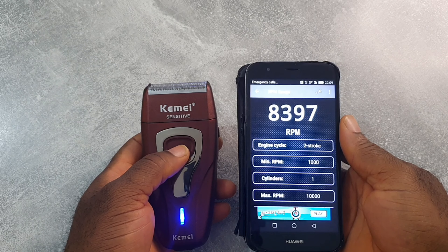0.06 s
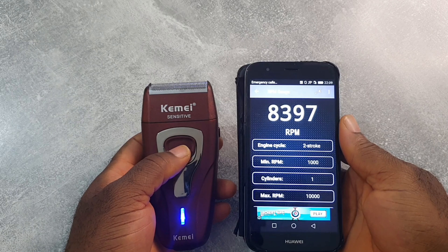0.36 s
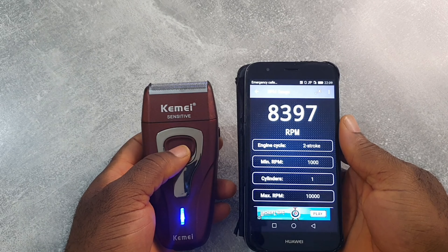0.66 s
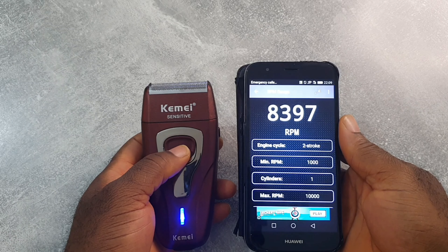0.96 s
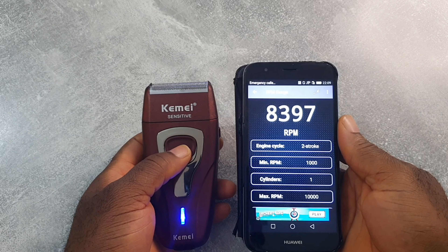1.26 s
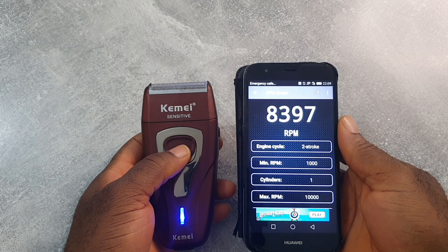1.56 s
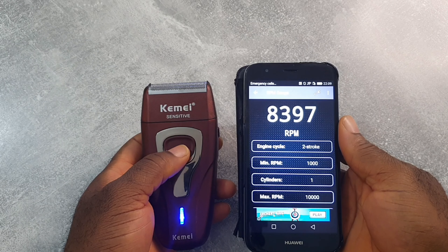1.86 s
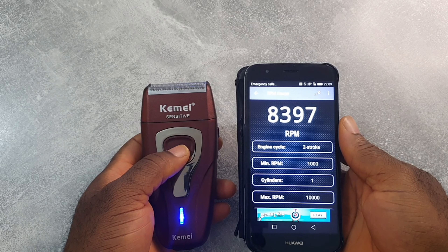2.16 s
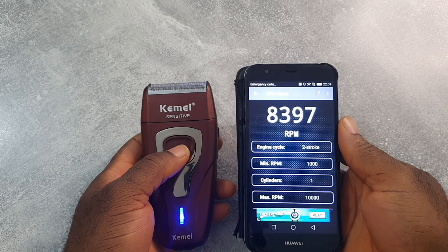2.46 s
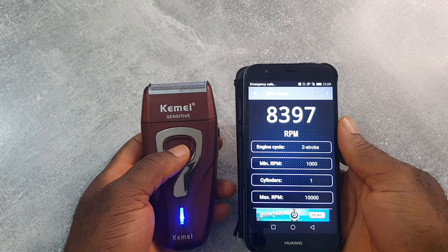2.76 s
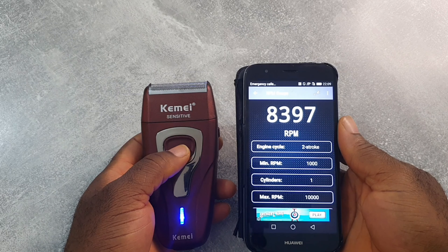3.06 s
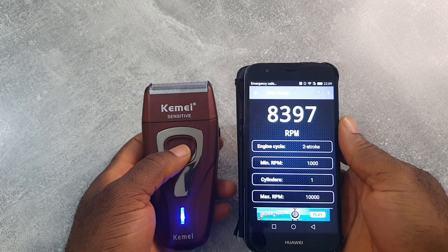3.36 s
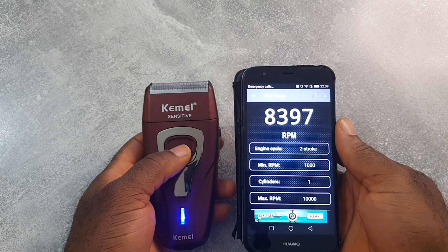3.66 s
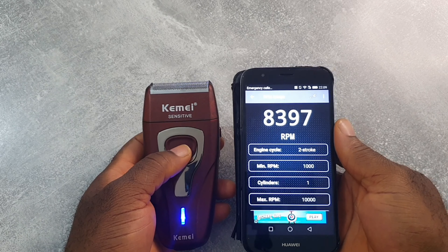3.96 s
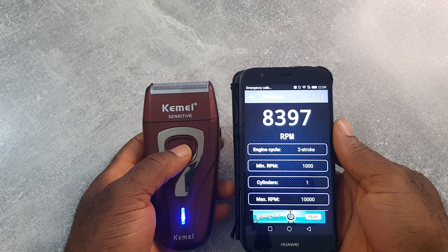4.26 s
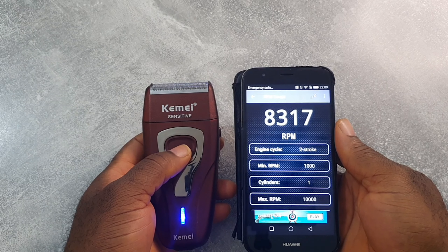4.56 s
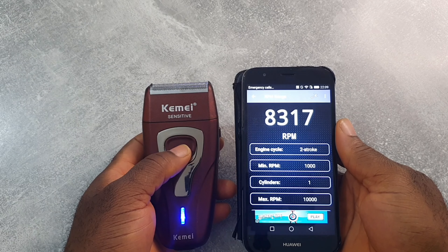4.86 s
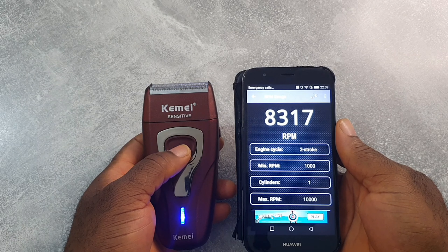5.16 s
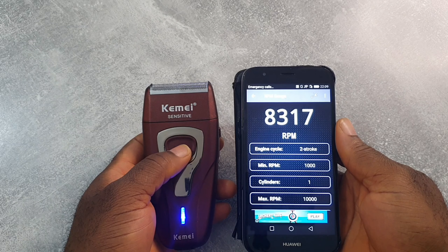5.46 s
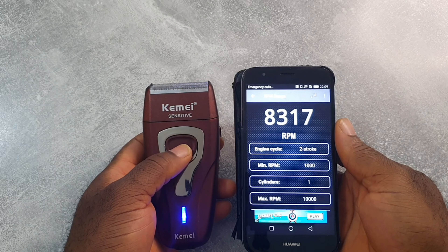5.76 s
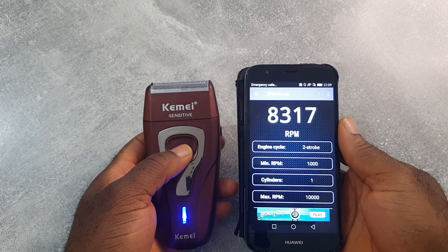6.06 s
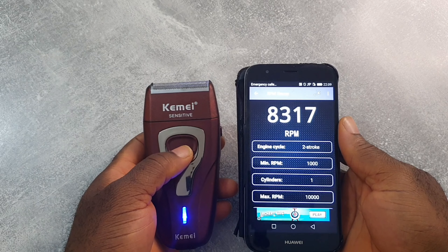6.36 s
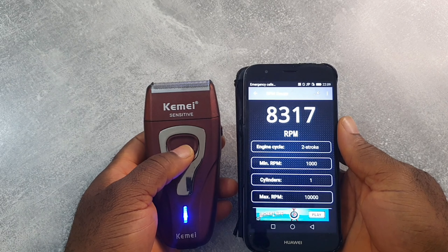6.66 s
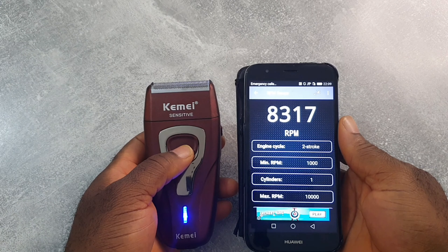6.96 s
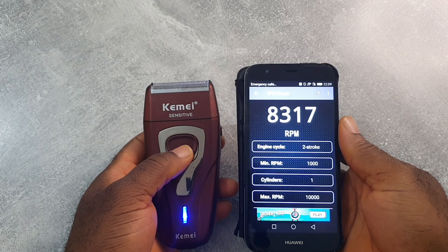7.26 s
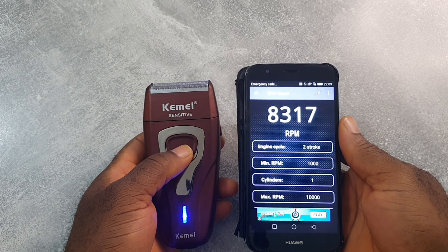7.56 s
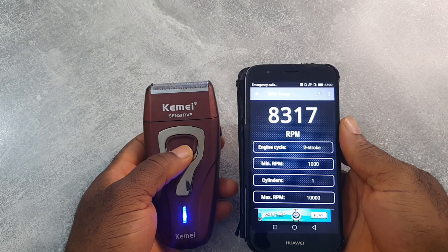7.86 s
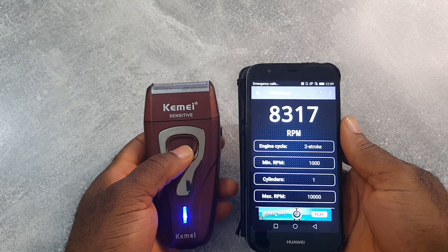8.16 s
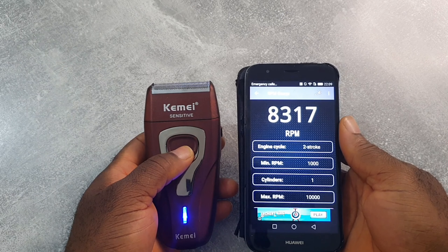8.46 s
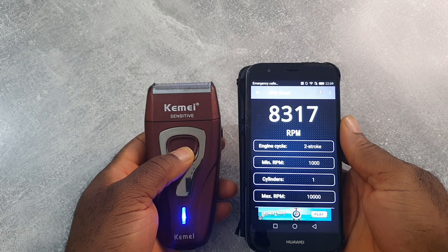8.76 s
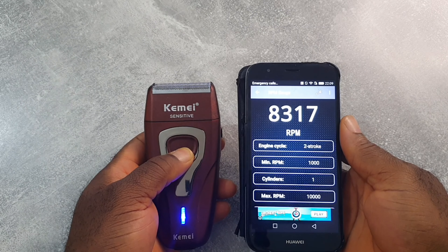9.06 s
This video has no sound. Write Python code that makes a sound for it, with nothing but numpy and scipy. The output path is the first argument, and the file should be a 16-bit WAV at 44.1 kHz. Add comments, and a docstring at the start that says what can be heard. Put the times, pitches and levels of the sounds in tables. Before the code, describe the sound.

A small electric foil shaver runs close to the microphone in a quiet room. Its steady buzz mixes a plastic drone with a bright metallic rattle and a fine hiss, and now and then the blades rasp briefly. About midway the pitch sags very slightly and the tone changes colour, then the buzz carries on. A ceiling fan hums faintly underneath throughout.

```python
"""In a quiet room, a small foil shaver runs in someone's hand, close to a phone.
Each motor turn throws the blades to and fro: a few knocks ring the plastic case and metal head,
and the blades hiss under the foil. Now and then the blades slip, speed up and rasp.
Midway a firmer grip slows the motor a little and changes the colour of the buzz.
A ceiling fan hums and throbs far below it in pitch."""
import sys
import numpy as np
from scipy import signal
from scipy.fft import rfft, irfft
from scipy.io import wavfile
from scipy.ndimage import uniform_filter1d, map_coordinates

SR = 44100
rng = np.random.default_rng(int(sys.argv[2]) if len(sys.argv) > 2 else 0)


def generate_wav(signal):
    """Clip the signal to [-1, 1] and save it as 16-bit WAV at the path in sys.argv[1]."""
    frames = np.transpose(np.atleast_2d(signal))
    scaled = np.clip(frames, -1, 1) * 32767
    pcm = np.round(scaled).astype(np.int16)
    wavfile.write(sys.argv[1], SR, pcm)


N = 401751
TIME = np.arange(N) / SR


def undb(db):
    """Turn decibels into a gain to multiply by."""
    return 10 ** (np.asarray(db) / 20)


def read(table, at):
    """Look up `at` in the first column; give the other columns, joining rows by straight lines."""
    x, *columns = np.transpose(table)
    return [np.interp(at, x, c) for c in columns]


def noise(spectrum, likeness):
    """Stereo noise of spread 1, shaped by (pitch_hz, level_db) rows; likeness 1 makes both ears alike."""
    hz, db = np.transpose(spectrum)
    bin_hz = np.arange(N // 2 + 1) * SR / N
    gain = undb(np.interp(np.log(bin_hz + 1), np.log(hz), db))
    white = rng.standard_normal((3, N))
    stereo = np.sqrt(likeness) * white[2] + np.sqrt(1 - likeness) * white[:2]
    x = irfft(rfft(stereo) * gain, N)
    return x / x.std()


def wander(shape, size):
    """A random drift of spread 1, smoothed over `size` rows: bigger is slower."""
    x = rng.standard_normal(shape)
    for _ in range(2):
        x = uniform_filter1d(x, size, axis=0)
    return x / x.std()


# How hard the hand holds the case (0 light, 1 firm, 2 squeezed). Columns: time_s, grip
GRIP = [(0, 0.5), (3.52, 0.5), (3.72, 0.72), (3.9, 0.5), (4.08, 0.5), (4.22, 1.73), (4.34, 2.1),
        (4.45, 1.43), (5.3, 1.43), (5.42, 2), (6.1, 2), (6.2, 1.5), (6.6, 0.94), (6.7, 0.5), (7.85, 1),
        (7.95, 2), (8.08, 0.8), (8.3, 1.3), (8.4, 1.5), (8.58, 2), (8.65, 0.03), (9.11, 0.36)]

def grip_at(times):
    """The hand's grip at these times."""
    return read(GRIP, times)[0]


def firmness(times):
    """How fully the hand has closed, from 0 to 1; squeezing adds no more."""
    return np.clip(grip_at(times), 0, 1)


FREE_HZ = 138.95  # motor turns per second before anything slows it

def motor_speed(slip_hz, grip_sag_hz=.5, battery_sag_hz_per_s=.04):
    """Turns per second: the grip and the draining battery slow the motor, a slip frees it."""
    unsteady_hz = .05 * wander(N, size=5000) + .085 * wander(N, size=700)
    return FREE_HZ - grip_sag_hz * grip_at(TIME) - battery_sag_hz_per_s * TIME + slip_hz + unsteady_hz


# The knocks in one motor turn. Columns: place_turns, level_db, centre_hz, half_width_octaves
KNOCKS = [(0.077, 1.5, 2020, 0.71), (0.198, -0.5, 2810, 0.45), (0.119, -1.5, 7440, 1.4),
          (0.359, 5, 953, 0.75), (.47, -4, 4970, 3.3), (0.663, -1.5, 8800, 1.16), (0.876, 3.5, 4190, 0.393)]

def blade_knocks(orders, hz, firm, extra_hz, jitter_turns=.00026, bend_turns=.03005):
    """Strength and phase of the knocks: a row per turn, a column per harmonic (multiple of the speed)."""
    turns, count = len(firm), len(orders)
    # the swinging mass shakes the case all through the turn
    shake = 6 / (1 + (hz / 720) ** 10)
    total = shake * np.exp(2j * np.pi * rng.random(count))
    for place, db, centre_hz, octaves in KNOCKS:
        # grip, speed and chance move each knock within the turn
        by_grip, by_speed = rng.choice([-1, 1], size=2)
        when = place + .0091 * by_grip * firm + .0064 * by_speed * extra_hz
        when += .00017 * wander(turns, size=20) + jitter_turns * rng.standard_normal(turns)
        band = undb(db) / (1 + (np.log2(hz / centre_hz) / octaves) ** 6)
        # the head rings in many small ways, which smears the treble
        modes = rng.standard_normal(count) + 1j * rng.standard_normal(count)
        smear = 1 + .93 * modes / (1 + (3000 / hz) ** 6)
        # bending waves carry the highs faster, so each knock is a short falling chirp
        early = bend_turns * (np.log(hz / centre_hz) - 1)
        total = total - band * smear * np.exp(-2j * np.pi * orders * (when[:, None] - early))
    # pressed against the foil, the blades also clack, a tenth of the way into each turn
    clack = .7 * firm[:, None] / (1 + np.log2(hz / 2800) ** 4)
    return total - clack * np.exp(-2j * np.pi * orders * .1)


# How the case's drone rises and falls around its average. Columns: time_s, level_db
CASE_SWELL = [(0.0, -38), (0.23, -36.5), (0.61, -38), (1.01, -37.5), (3.2, -37), (4.23, -36.5),
              (8.4, -38.5), (8.55, -41), (9.11, -40)]

def case_drone(times, hz, slip_hz, slip_db_per_hz=-.5):
    """Change in dB: the drone dips in a slip; its lowest tones, from the moving mass, stay steady."""
    swell_db, = read(CASE_SWELL, times)
    knocked_share = 1 / (1 + (700 / hz) ** 4)
    return -1 + knocked_share * (.4 + swell_db - swell_db.mean() + slip_db_per_hz * slip_hz)


# The brightness of the head's rattle. Columns: pitch_hz, change_db
RATTLE_COLOUR = [(3200, 0.5), (3800, 0.5), (4450, 0), (5000, 1), (5700, -1), (7000, -0.34), (8500, 1.5),
                 (12000, 1), (15500, 1)]

def head_rattle(hz, firm, slip_hz, grip_db=-.82, rasp_hz=4900, rasp_width_hz=790):
    """Change in dB: a firm hold softens the rattle, and slipping blades make one band rasp."""
    rasp_band = np.exp(-((hz - rasp_hz) / rasp_width_hz) ** 2)
    slip_db_per_hz = 4.5 * rasp_band - .8
    return read(RATTLE_COLOUR, hz)[0] + .47 + grip_db * firm + slip_db_per_hz * slip_hz


# Bands that ring more (+) or less (-) for a while.
# Columns: start_s, end_s, centre_hz, half_width_hz, change_db
RESONANCES = [(0.122, 0.47, 6900, 149, -3), (0.472, 0.78, 5540, 200, 0), (1.278, 1.56, 6700, 110, 7),
              (1.56, 1.92, 4430, 102, 2.5), (1.56, 2.1, 6800, 120, 6), (3.068, 3.27, 4970, 602, 3.5),
              (3.19, 3.27, 4950, 300, 5), (3.298, 3.9, 6740, 150, 6), (3.618, 4.2, 1870, 200, 2),
              (4.17, 5, 4370, 140, 5), (4.12, 6.2, 1105, 70, 2), (4.302, 5.8, 2860, 200, 1),
              (4.88, 6.1, 5660, 164, 4), (5.3, 5.9, 3320, 120, -2), (6.152, 7.8, 2980, 129.4, -5),
              (6.398, 8.5, 4820, 130.3, -6), (6.618, 7.88, 6440, 302.3, 3.5), (7.898, 9.4, 3230, 350, -2.5),
              (8.638, 8.9, 5030, 79.3, 11.5), (0, 3.6, 10400, 300, 0), (8.639, 8.9, 5600, 91.5, 3),
              (8.639, 9.2, 4100, 200, -1)]

def resonances(times, hz, fade_s=.01):
    """Change in dB: as the blades shift in their seat, narrow bands ring out or are damped."""
    change_db = 0
    for start, end, centre, width, db in RESONANCES:
        fade = np.clip(np.minimum(times - start, end - times) / fade_s + .5, 0, 1)
        change_db += db * fade * np.exp(-((hz - centre) / width) ** 2)
    return change_db


def blade_chatter(times, hz, spread_db=1.4, usual_hold_s=.12, centre_hz=4400):
    """Change in dB: each time the blades settle into a new seat, the middle harmonics jump in level."""
    seat = np.cumsum(rng.random(len(times)) < 1 / (usual_hold_s * FREE_HZ))
    seat_levels = rng.standard_normal((len(times), len(hz)))
    jumps = uniform_filter1d(seat_levels[seat], size=4, axis=0)
    return spread_db * jumps / (1 + np.log2(hz / centre_hz) ** 6)


# The plastic case's tones. Columns: harmonic_number, light_grip_db, firm_grip_db, left_minus_right_db
CASE_TONES = [(1, -62.5, -63.5, -2), (2, -67.5, -67.0, 1), (3, -52.5, -50.5, 2), (4, -58.0, -57.5, 5),
              (5, -59.0, -58.0, 1), (6, -61.0, -62.0, 1), (7, -47.5, -47.0, -1), (8, -46.5, -42.5, -3),
              (9, -43.0, -43.0, 0), (10, -48.5, -52.5, 4), (11, -52.0, -50.5, 2), (12, -46.5, -47.0, 2),
              (13, -45.5, -43.0, 10), (14, -45.0, -48.5, 10), (15, -49.0, -52.0, 5), (16, -61.5, -60.0, 3),
              (17, -48.5, -47.0, 7), (18, -45.0, -47.5, -4), (19, -47.5, -48.5, 2), (20, -50.5, -51.0, 1),
              (21, -55.5, -52.5, 2), (22, -49.0, -50.0, 4), (23, -50.5, -55.0, 0), (24, -50.5, -49.5, 5),
              (25, -42.5, -46.0, 6), (26, -48.0, -49.0, 2), (27, -52.0, -53.0, 0), (28, -57.5, -56.0, 3),
              (29, -50.0, -52.5, 4), (30, -51.5, -57.5, 1)]
# The metal head's tones. Columns: pitch_hz, light_grip_db, firm_grip_db, left_minus_right_db
HEAD_TONES = [(4290, -56.0, -55.0, 3), (4430, -50.0, -50.0, 4), (4570, -53.0, -51.5, -1),
              (4710, -55.5, -55.5, -3), (4850, -50.5, -55.5, 1), (4990, -58.0, -56.0, 2),
              (5120, -56.0, -51.0, 1), (5260, -52.0, -56.0, -1), (5400, -51.0, -51.5, 3),
              (5540, -50.5, -55.0, 4), (5680, -49.5, -49.0, 4), (5820, -57.5, -56.5, 3),
              (5960, -54.0, -53.0, 4), (6090, -54.5, -55.0, 5), (6230, -60.0, -58.5, 6),
              (6370, -50.5, -53.0, 10), (6510, -54.5, -55.0, 4), (6650, -53.0, -53.5, 9),
              (6790, -49.5, -49.5, 9), (6920, -45.5, -45.5, 5), (7060, -52.0, -47.0, 11),
              (7200, -56.5, -56.5, 10), (7340, -62.0, -56.0, 10), (7480, -61.5, -58.0, 12),
              (7760, -58.0, -58.5, 17), (8170, -61.5, -65.5, 14), (8590, -61.0, -60.5, 12),
              (9140, -59.0, -64.0, -2), (9700, -60.5, -60.5, 5), (10390, -65.0, -66.5, -2),
              (10940, -58.5, -64.5, -7), (11500, -63.5, -64.0, -2), (12050, -62.5, -65.0, 3),
              (12600, -59.0, -63.0, 2), (13160, -63.0, -60.0, 5), (13570, -58.5, -60.0, 6),
              (14130, -63.5, -64.0, 2), (14680, -60.5, -61.0, 5), (15100, -59.0, -60.0, 8),
              (15510, -54.5, -56.5, 8), (15790, -64.0, -60.0, 8)]
# How squeezing colours the buzz. Columns: pitch_hz, change_db_per_grip
SQUEEZE_COLOUR = [(1000, 0.5), (1250, -1.5), (1660, -2), (1800, 2.5), (1940, 0), (2400, 1), (4430, 0.5),
                  (5100, 0), (5700, 0), (6600, 3), (7000, -2.5), (9000, 0)]

def case_and_head(times, orders, hz, slip_hz, split_hz=2600, neutral_grip=1.06):
    """Level and left-right balance of each harmonic in dB: the case rings low, the head rings high."""
    times = times[:, None]
    firm = firmness(times)
    slip_hz = np.interp(times, TIME, slip_hz)
    # the head's crowded top resonances favour some harmonics, and others when it is held firmly
    uneven_db = 2.5 * rng.standard_normal((3, len(orders))) / (1 + (7600 / hz) ** 20)
    head = np.array(read(HEAD_TONES, hz)) + uneven_db
    light_db, firm_db, pan_db = np.where(orders <= len(CASE_TONES), read(CASE_TONES, orders), head)
    squeeze_db = read(SQUEEZE_COLOUR, hz)[0] * (grip_at(times) - neutral_grip)
    held_db = light_db + (firm_db - light_db + squeeze_db) * firm
    metal_share = 1 / (1 + (split_hz / hz) ** 6)
    drone_db = (1 - metal_share) * case_drone(times, hz, slip_hz)
    rattle_db = metal_share * head_rattle(hz, firm, slip_hz)
    return held_db + drone_db + rattle_db + resonances(times, hz), pan_db


# How far the wave at the left microphone runs ahead of the right. Columns: pitch_hz, lead_radians
LEFT_LEAD = [(140, -.5), (280, 0), (415, -.7), (555, .8), (830, -.2), (1110, .55), (1245, .45), (1385, 1.4),
             (1660, 1.1), (1800, 1.9), (1940, -.85), (2080, 1), (2355, .85), (2490, 2.7), (2770, 2.7),
             (2910, 1.2), (3185, .6), (3325, -.55), (3460, 2.1), (3600, 2.2), (3740, 4.5), (4020, 4.1),
             (4290, 2), (4430, 4.1), (4570, 1.9), (4850, 4.2), (5260, 4), (5680, 4), (6090, -.3),
             (6370, 1.3), (6650, -2), (6790, -2), (6925, 2.3), (7060, 1.2), (7340, 2.9), (16000, 1.8)]

def paths_to_phone(hz, pan_db, shape):
    """Gain and phase at each microphone: the left is nearer, and sound bounces off the swaying hand."""
    scatter = 1.49 * rng.standard_normal(len(hz)) / (1 + (8000 / hz) ** 20)
    sway = wander(shape, size=36) / (1 + (3000 / hz) ** 2)
    lead = read(LEFT_LEAD, hz)[0] + scatter + sway
    average = lead.mean(axis=0)
    lead += np.angle(np.exp(1j * average)) - average  # keep the average within half a cycle
    # the weaker side hears more of the reflections
    left_share = 1 / (1 + undb(2 * pan_db))
    left = undb(pan_db / 2) * np.exp(1j * lead * left_share)
    right = undb(-pan_db / 2) * np.exp(1j * lead * (left_share - 1))
    same_power = np.sqrt(2 / (undb(pan_db) + undb(-pan_db)))
    return left * same_power, right * same_power


def shaver_buzz(turn, speed, slip_hz, flutter_db=2.5, tremble_db=.3, samples_per_turn=2048):
    """Knocks blur into a buzz: each turn gets its own wave, played at the motor's speed."""
    orders = np.arange(1, 115)
    hz = orders * speed.mean()
    times = np.interp(np.arange(int(turn[-1]) + 2), turn, TIME)  # when each turn starts
    extra_hz = np.interp(times, TIME, speed - speed.mean())
    knocks = blade_knocks(orders, hz, firmness(times), extra_hz)
    # low harmonics hold steady, while high ones swell and fade as the knocks shift
    loose = 1 / (1 + (5500 / hz) ** 2)
    usual_strength = np.sqrt(uniform_filter1d(np.abs(knocks) ** 2, size=55, axis=0))
    swell = (np.abs(knocks) / usual_strength) ** loose
    db, pan_db = case_and_head(times, orders, hz, slip_hz)
    db += blade_chatter(times, hz)
    db += np.sqrt(loose) * flutter_db * wander(db.shape, size=3)
    db += tremble_db * wander((len(times), 1), size=3)
    harmonics = undb(db) * swell * np.exp(1j * np.angle(knocks))
    position = [turn, turn % 1 * samples_per_turn]  # which wave, and how far into it
    sides = []
    for path in paths_to_phone(hz, pan_db, db.shape):
        spectrum = np.pad(harmonics * path, ((0, 0), (1, 0)))  # nothing at 0 Hz
        waves = irfft(spectrum, samples_per_turn) * samples_per_turn / np.sqrt(2)
        sides.append(map_coordinates(waves, position, order=1, mode="grid-wrap"))
    return np.array(sides)


# The colour of the blades' hiss. Columns: pitch_hz, level_db
FOIL_COLOUR = [(350, -5), (760, -9), (1180, 1), (1870, 1.5), (2290, -4), (2650, -1), (3000, -3), (3520, 1),
               (3950, -6), (4550, -2), (5050, -5), (5750, 0), (6440, -2), (6990, 1), (7500, -8),
               (9000, -13), (10400, -12), (12530, -7), (14100, -7), (15440, -1)]

def foil_hiss(turn, scratch_db, base_db=-50.5, grip_db=2.5):
    """Blades rub the foil: the hiss swells on both strokes, grows with the grip and flares in a slip."""
    hiss_db = base_db + grip_db * firmness(TIME) + .5 * wander(N, size=7000) + scratch_db
    strokes = 1 + .35 * np.cos(4 * np.pi * (turn - .17)) + .05 * np.cos(2 * np.pi * (turn - .2))
    side_db = np.array([[1.2], [-1.2]])
    return undb(hiss_db + side_db) * strokes * noise(FOIL_COLOUR, likeness=.3)


# Tones of the fan's passing blades. Columns: pitch_hz, level_db
FAN_TONES = [(21.65, -59.5), (43.3, -69), (64.95, -69), (86.6, -73.5), (127.8, -76)]
# The mains hum and the tone of the fan's lagging rotor. Columns: pitch_hz, level_db
FAN_HUM = [(100.0, -58.5), (98.73, -63)]
# The colour of the room's air. Columns: pitch_hz, level_db
AIR_COLOUR = [(20, -18), (36, -4), (50, -15), (90, 0), (125, -1), (165, -18), (200, -12), (300, -11),
              (500, -17), (1000, -36), (8000, -25)]

def ceiling_fan(hum_trim_db=-.5, throb_peak_s=3.8, air_db=-62):
    """Passing blades make deep tones, two close hums throb against each other, and air stirs softly."""
    blades = sum(undb(db) * np.sin(2 * np.pi * (hz * TIME + rng.random())) for hz, db in FAN_TONES)
    from_peak_s = TIME - throb_peak_s
    hum = sum(undb(db + hum_trim_db) * np.cos(2 * np.pi * hz * from_peak_s) for hz, db in FAN_HUM)
    return np.sqrt(2) * (blades + hum) + undb(air_db) * noise(AIR_COLOUR, likeness=.75)


# Moments when the shaver's blades slip. Columns: middle_s, half_length_s, added_speed_hz, added_hiss_db
BLADE_SLIPS = [(0.57, 0.088, 0.72, 0), (0.775, 0.039, 0.46, 2), (1.136, 0.14, 0.2, 2),
               (1.995, 0.026, 0.42, 4), (2.14, 0.12, 0.39, 3), (2.625, 0.075, 0.64, 4),
               (2.89, 0.099, 0.49, 0), (3.174, 0.1, 1, 3), (3.427, 0.08, 0.4, 5), (3.991, 0.091, .38, 3),
               (4.403, 0.0302, 0.81, 4), (5.212, 0.043, 0.61, 3), (6.687, 0.037, 0.52, 5),
               (7.084, 0.024, 0.48, 3), (8.657, 0.027, 0.3, 3), (8.94, 0.034, 0.37, 3)]

def blade_slips():
    """The blades run free for a moment: added speed and hiss rise and fall like a bell curve."""
    middle_s, half_length_s, speed_hz, hiss_db = np.transpose(BLADE_SLIPS)
    bells = np.exp(-((TIME[:, None] - middle_s) / half_length_s) ** 2)
    return bells @ speed_hz, bells @ hiss_db


def scene():
    """The shaver buzzes and hisses over the fan."""
    slip_hz, scratch_db = blade_slips()
    speed = motor_speed(slip_hz)
    turn = np.cumsum(speed) / SR  # motor turns so far
    return shaver_buzz(turn, speed, slip_hz) + foil_hiss(turn, scratch_db) + ceiling_fan()


def record(dry):
    """The phone cuts off the highest treble."""
    top_hz = 15720
    return signal.sosfilt(signal.ellip(12, .1, 80, top_hz, fs=SR, output="sos"), dry)


dry = scene()
out = record(dry)
generate_wav(out)
```